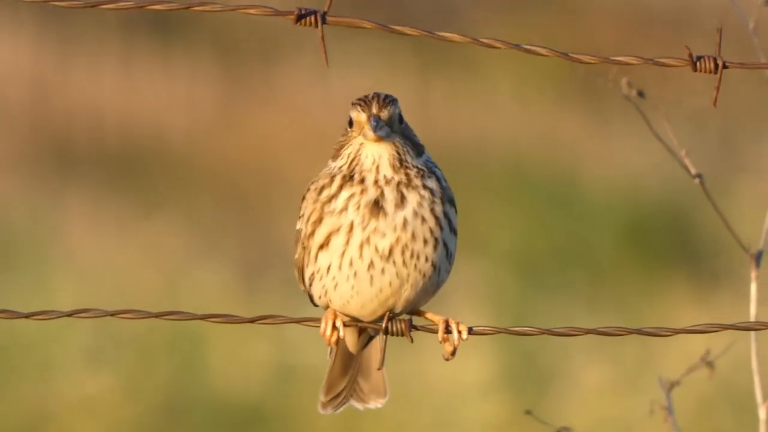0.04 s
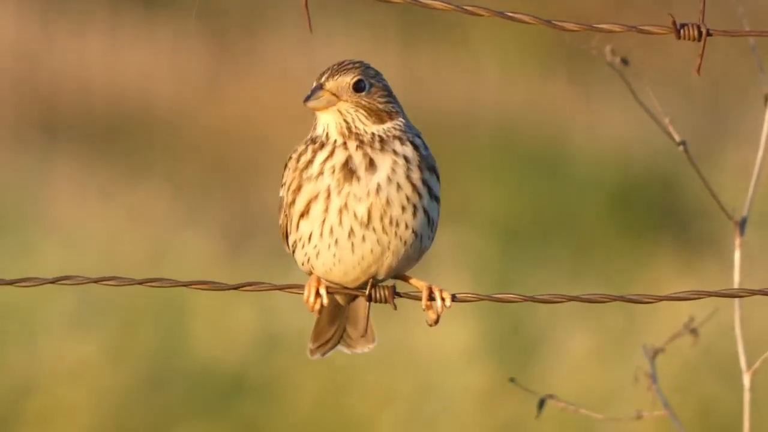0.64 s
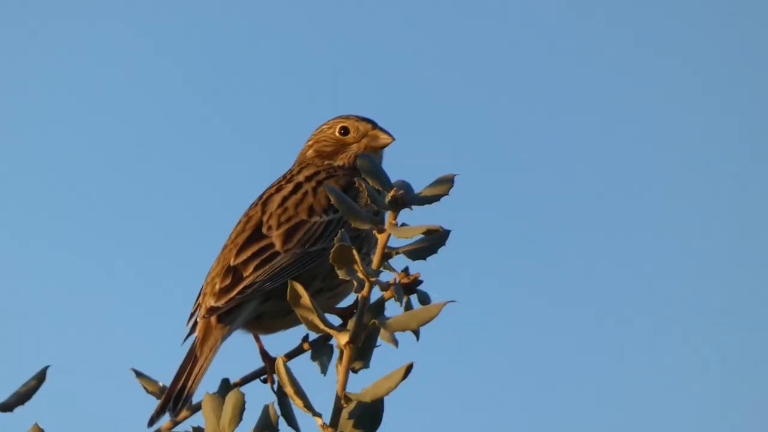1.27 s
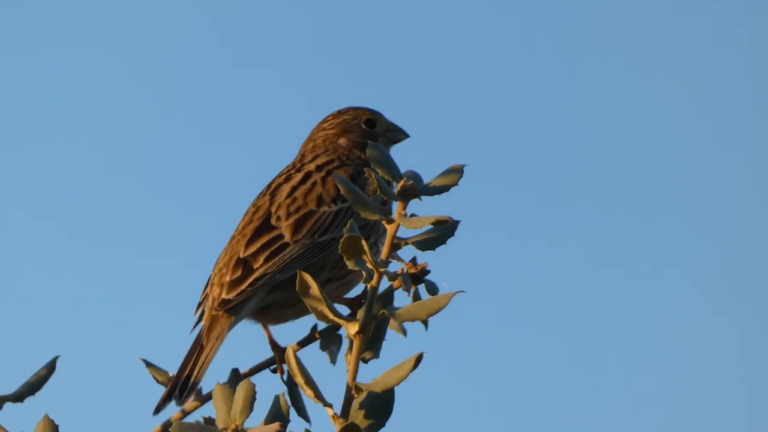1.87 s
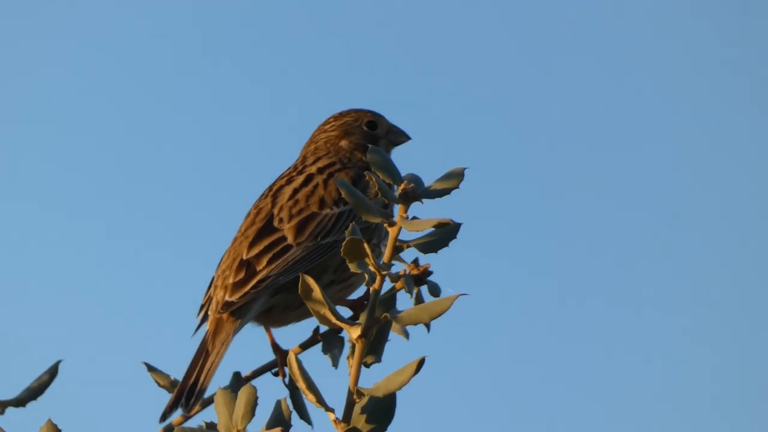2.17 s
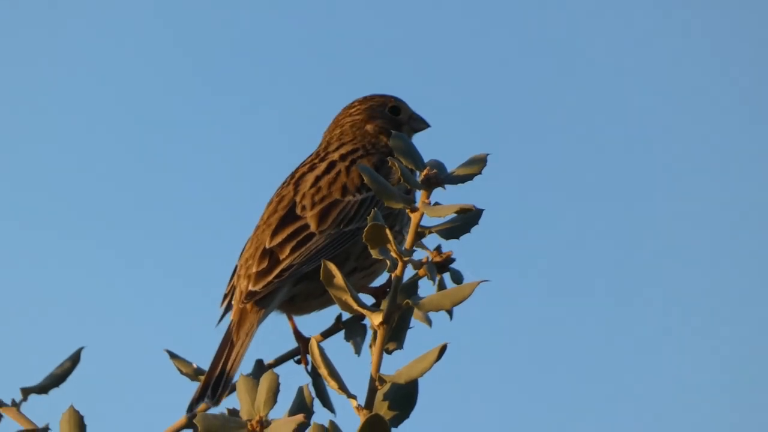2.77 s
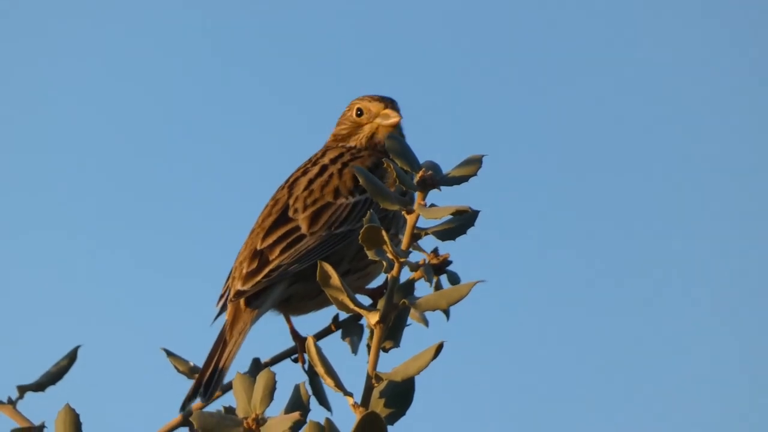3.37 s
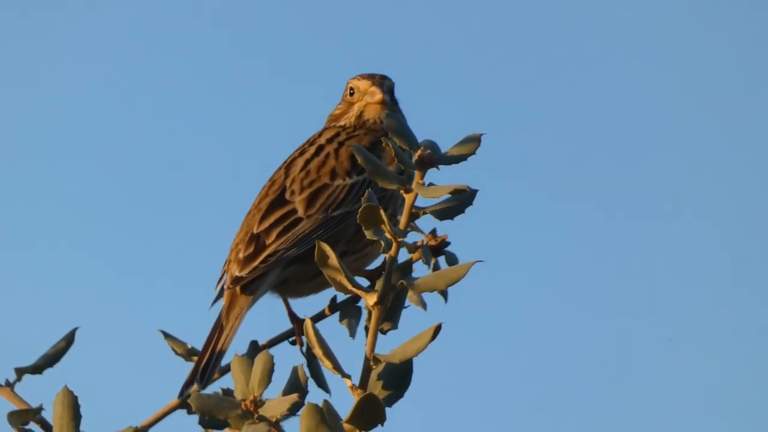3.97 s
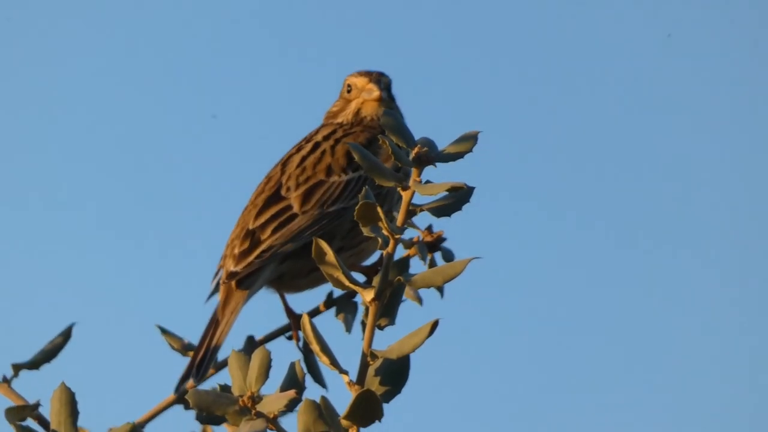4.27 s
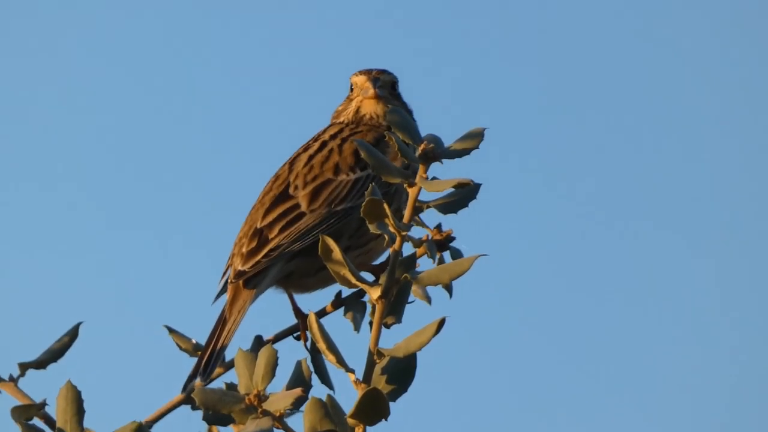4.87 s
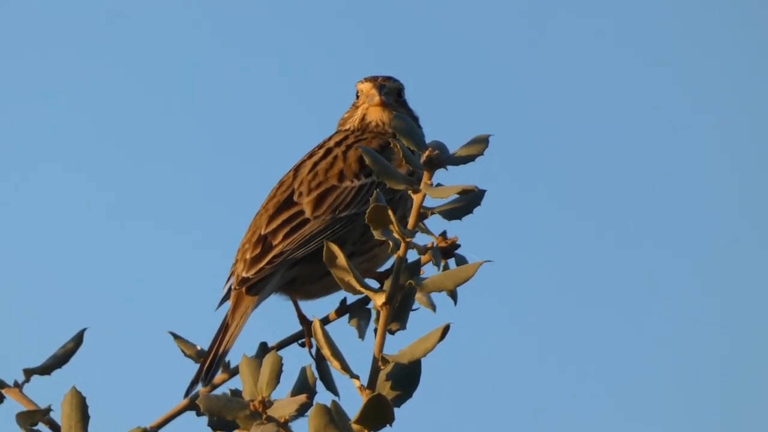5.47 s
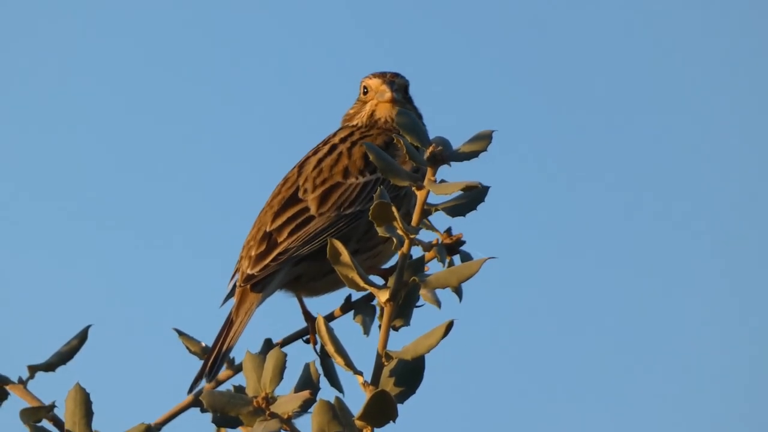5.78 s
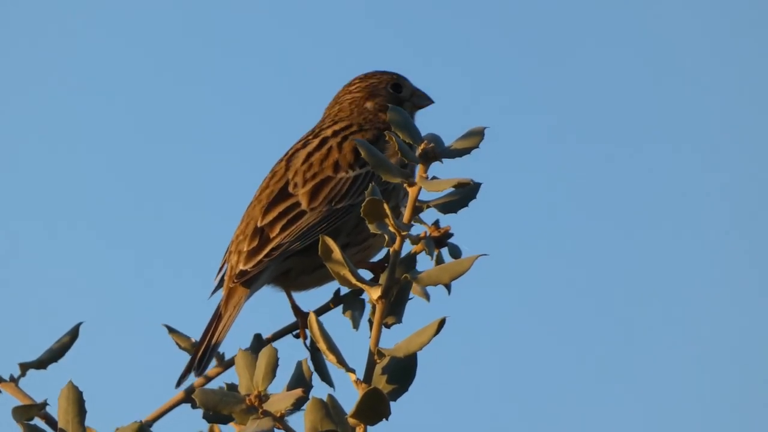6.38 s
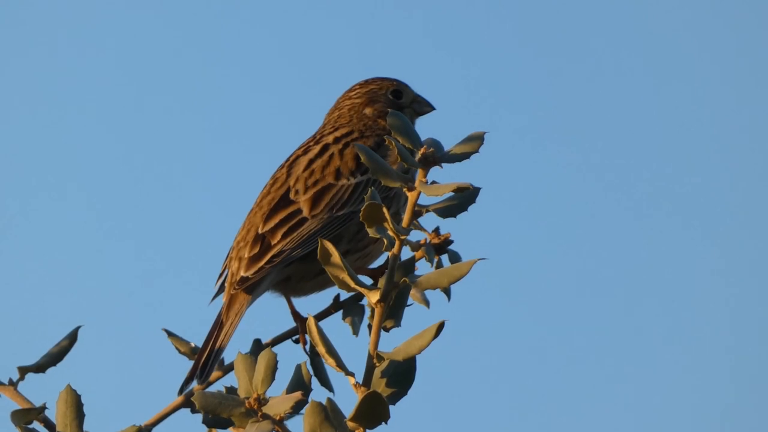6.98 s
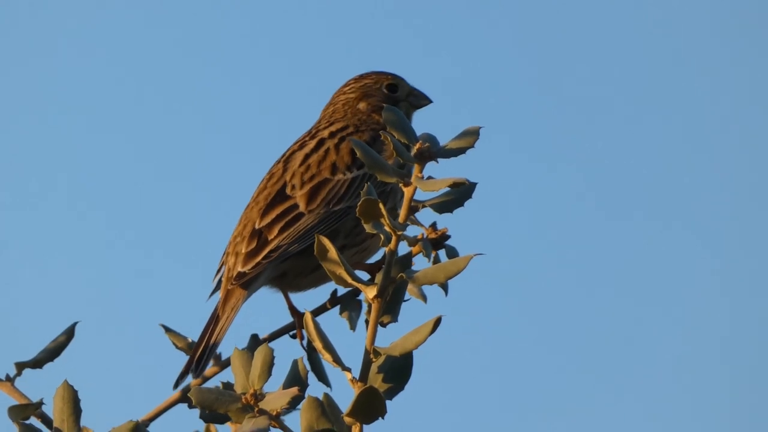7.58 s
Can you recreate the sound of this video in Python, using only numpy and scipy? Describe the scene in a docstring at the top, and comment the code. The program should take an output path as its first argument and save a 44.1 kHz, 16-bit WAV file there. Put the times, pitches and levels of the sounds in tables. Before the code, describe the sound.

A close lens motor hums and ticks quietly outdoors while one songbird calls once, brief and piercing, and other birds chirp far off.

```python
"""Open country: a perched corn bunting gives one sharp, warbled 'tsip', a burst of fused whistled pulses.
Other birds chirp far off, over a faint wavering tone and a soft hiss of air that lifts in one gust.
Close by, a camera's lens drive hums and whirrs through the resonances of its body; the lens knocks,
the housing ticks and clacks. All sound cuts out briefly before the call."""
import sys
import numpy as np
from scipy import signal
from scipy.fft import rfft, irfft, next_fast_len
from scipy.io import wavfile
from scipy.ndimage import uniform_filter1d

SR = 44100
rng = np.random.default_rng(int(sys.argv[2]) if len(sys.argv) > 2 else 0)


def generate_wav(signal):
    """Clip the signal to [-1, 1] and save it as 16-bit WAV at the path in sys.argv[1]."""
    frames = np.transpose(np.atleast_2d(signal))
    scaled = np.clip(frames, -1, 1) * 32767
    pcm = np.round(scaled).astype(np.int16)
    wavfile.write(sys.argv[1], SR, pcm)


N = 336483
TIME = np.arange(N) / SR

# hiss, in phase (mid) and in antiphase (side): (frequency [Hz], relative density [dB/Hz])
AIR_MID_SPECTRUM = [(25, -111), (80, -94.5), (250, -95), (500, -91.5), (1000, -102.5), (1600, -102),
                    (3000, -105), (5000, -112), (7200, -117), (8300, -124), (9000, -118), (10200, -115.7),
                    (13000, -122.7), (15000, -132)]
AIR_SIDE_SPECTRUM = [(25, -112), (80, -95.5), (200, -84.5), (500, -96), (1100, -89.5), (1600, -104),
                     (3000, -109), (5000, -116), (8300, -126), (10000, -120), (14000, -131)]
# far tone: (start [s], end [s], level [dB])
TONE_SPANS = [(1.3, 2.25, -74), (4.15, 5.347, -74)]
# far chirps: (time [s], length [s], start [Hz], middle [Hz], end [Hz], relative level [dB], rasp [Hz])
FAR_CHIRPS = [(.08, .19, 4520, 4400, 4470, -70, 44), (.11, .056, 2830, 2730, 2700, -64, 33),
              (.668, .022, 4650, 4150, 3750, -64, 60), (.786, .018, 5350, 4780, 4400, -63, 60),
              (.864, .022, 4700, 4250, 3950, -64, 60), (.83, .16, 3530, 3920, 4390, -60, 30),
              (.975, .14, 4380, 4620, 4600, -66, 35), (1.40, .16, 3990, 3780, 3740, -61.5, 50),
              (1.84, .038, 3790, 5140, 4820, -62, 120), (2.57, .034, 4900, 5150, 5750, -58.5, 100),
              (2.593, .012, 5700, 6150, 5950, -59, 100), (2.92, .04, 4100, 4850, 5150, -62, 200),
              (3.474, .017, 4600, 5450, 4800, -58, 200), (3.745, .085, 4400, 3500, 2950, -62, 90),
              (4.16, .06, 5080, 4650, 4300, -69, 100), (4.23, .08, 4000, 3980, 3990, -64, 35),
              (4.361, .06, 2850, 2550, 2380, -59, 69), (4.95, .14, 3410, 3370, 3300, -67, 80),
              (5.063, .04, 5100, 4550, 4200, -66, 100), (5.105, .065, 4000, 3950, 3600, -64, 100),
              (5.74, .03, 2400, 2550, 2620, -64, 60), (5.925, .16, 4880, 4600, 4790, -65, 15),
              (6.03, .018, 4000, 3850, 3650, -65, 60), (6.058, .013, 3600, 3850, 3900, -65, 60),
              (6.11, .028, 4650, 4350, 4000, -67.5, 60), (6.185, .045, 4050, 3200, 3000, -65, 60),
              (6.355, .05, 3050, 2800, 2720, -64, 130), (6.645, .05, 2550, 2780, 2850, -63.5, 50),
              (6.698, .031, 6400, 6680, 6950, -60.5, 60), (6.732, .032, 6650, 7000, 5900, -64.5, 70),
              (6.937, .07, 5980, 6270, 6750, -62, 45), (6.996, .026, 6740, 6900, 5300, -62.5, 60),
              (7.085, .075, 5500, 5150, 4700, -67.5, 170), (7.164, .061, 5800, 6000, 6540, -59.5, 40),
              (7.218, .031, 6700, 7080, 5370, -62, 60), (7.17, .11, 4100, 3870, 3880, -58.5, 150)]
# far trill: (time [s], length [s], relative level [dB])
TRILL_BURSTS = [(3.125, .115, -62.5), (3.26, .05, -65)]
# harsh far calls: (middle [s], length [s], centre [Hz], width [Hz], level [dB])
FAR_RASPS = [(3.2, 0.21, 5600, 1900, -76), (3.17, .15, 2800, 1000, -73), (4.444, 0.079, 5800, 1500, -69.3),
             (4.515, .075, 4900, 1400, -68.8), (4.679, 0.071, 5700, 1250, -68)]
# handling ticks and dull bumps: (time [s], level [dB], centre [Hz], decay [s])
HOUSING_TICKS = [(.5385, -42, 2400, 0.003), (.7537, -53, 2000, 0.003), (.754, -55.5, 5950, 0.0037),
                 (2.0956, -64.5, 6460, 0.0035), (3.3323, -63.5, 6950, .003), (3.492, -64, 6700, .004),
                 (4.099, -59, 2600, .006), (4.541, -66, 6400, .003), (5.4, -53, 2570, 0.0086),
                 (5.414, -60.5, 6020, .003), (6.768, -61, 4950, 0.0041), (7.2903, -62, 5400, 0.0032)]
HOUSING_BUMPS = [(.538, -60, 179, 0.013), (.754, -57.5, 169, 0.011), (7.05, -56, 280, 0.059),
                 (7.2, -69, 251, 0.49)]
# lens knocks; a plastic part's clack and bounce: (time [s], relative level [dB], hardness [dB/octave])
LENS_CONTACTS = [(1.419, -57, 2), (1.753, -55, 4), (2.102, -53.5, 0), (4.099, -56.5, -5),
                 (4.2205, -53.5, 0), (4.756, -56, 3), (4.955, -56, 2), (5.1575, -55.5, 0),
                 (5.4005, -56, -6)]
PLASTIC_CONTACTS = [(0.5393, -43, 1), (0.5416, -41.5, -1)]
# their modes: (frequency [Hz], gain [dB], t60 [s])
LENS_MODES = [(802, -6.5, .06), (1003, 1.5, 0.07), (1367, 2, 0.044), (1602, 1, 0.039), (1820, -4, .05),
              (2620, -11, 0.099)]
PLASTIC_MODES = [(1350, 1, 0.026), (1800, -2.5, 0.034), (2560, -1.5, 0.0154), (4080, -10, 0.021),
                 (4470, 3, 0.0046)]
# camera body: (frequency [Hz], width [Hz], left gain [dB], right gain [dB], left phase lead [rad])
BODY_MODES = [(441.7, 42.8, 1, -2.5, -1), (394, 48, -19.5, -19, 0.7), (569, 72, -13, -29, -3),
              (633, 70, -14.5, -16.5, 4), (674, 30.2, -23, -28, 3.5), (790, 104, -12.5, -7.5, 3.5),
              (886, 98, -21, -16.5, 3), (961.4, 33, -22.5, -16, -4), (1053, 84, -24.5, -20, -8.5),
              (1187, 100, -20, -35, 1.5), (1368.7, 90, -21.5, -5, 0.43), (1600, 110, -46, -31.5, -0.5),
              (1775, 88, -41.5, -20, 0.6), (1987, 230, -40.5, -30.5, 1), (2128, 96, -26.5, -45, -0.8),
              (2545, 62, -29, -52, 3.5)]
# lens drive runs: (start [s], end [s], hum [dB], whirr [dB])
DRIVE_RUNS = [(0, 0.37, -51, -55), (0.385, 1.11, -52.5, -54.5), (1.293, 5.419, -54.3, -58.5),
              (5.483, 7.448, -54.3, -58.5), (7.502, 8.24, -52, -58)]
# brief swells in the hum's loudness: (time [s], boost [dB], half length [s])
HUM_SURGES = [(.24, 7, 0.045), (0.324, 6, .018), (0.573, 8, 0.012), (0.687, 7.5, 0.021),
              (0.788, 5.5, 0.061), (1.327, 4.5, 0.018), (1.47, 11, 0.032), (1.557, 7.5, 0.033),
              (1.719, 7.5, 0.033), (1.984, 8, 0.019), (2.114, 10, 0.015), (2.277, 10.5, 0.018),
              (2.655, 8, 0.041), (2.865, 6.5, 0.016), (3.005, 9, 0.018), (3.11, 9, .022), (3.22, 8, 0.015),
              (3.356, 7, 0.015), (3.673, 9.5, 0.026), (3.761, 8, 0.027), (3.837, 8, 0.016),
              (4.059, 10.5, 0.026), (4.563, 9, 0.021), (4.769, 5.5, .025), (4.856, 6, 0.017),
              (4.972, 6.5, 0.019), (5.057, 9.5, 0.017), (5.19, 6, 0.05), (5.744, 11, 0.01)]
# brief flares of the whirr near 1370 Hz: (time [s], boost [dB])
WHIRR_FLARES = [(.145, 6), (.387, 6), (.452, 5.5), (.553, 4), (.678, 6.5), (2.344, 11), (2.497, 4),
                (2.841, 5), (3.243, 5.5), (3.376, 6.5), (3.487, 7), (3.783, 5.5), (4.544, 5), (4.562, 7),
                (4.832, 4.5), (5.04, 6), (5.285, 7.5), (5.505, 6.5), (5.647, 7.5), (5.709, 4), (5.783, 8.5),
                (6.03, 5), (6.306, 8), (6.524, 7.5), (6.599, 6), (6.888, 6.5), (7.32, 6)]
# the 'tsip': (time [s], length [s], start [Hz], middle [Hz], end [Hz], relative level [dB], rasp [Hz])
CALL_PULSES = [(1.7755, .0052, 5650, 5550, 5500, -36, 150), (1.7806, .006, 5850, 5950, 5600, -25.3, 170),
               (1.7868, .0065, 5650, 6100, 6400, -23.8, 170), (1.7943, .0078, 6400, 5950, 6050, -22.3, 150),
               (1.8, .008, 6300, 6450, 6250, -24, 170), (1.8015, .008, 7050, 7400, 7000, -36.5, 200),
               (1.8062, .006, 5950, 5900, 6150, -24.5, 170), (1.811, .0085, 6550, 6900, 6650, -34.5, 170)]
# sizzle above it: (middle [s], length [s], centre [Hz], width [Hz], level [dB])
CALL_SIZZLE = [(1.786, .006, 10000, 900, -60), (1.803, .024, 12900, 2900, -55.5)]
# reflections from twigs and ground: (delay [s], gain [dB])
CALL_ECHOES = [(.0052, -16), (0.013, -22.5), (0.093, -38)]


def from_db(db):
    """Decibels to gain."""
    return 10 ** (np.asarray(db) / 20)


def band(x, low_hz, high_hz, order=2):
    """Butterworth band-pass."""
    sos = signal.butter(order, [low_hz, min(high_hz, .45 * SR)], "band", fs=SR, output="sos")
    return signal.sosfilt(sos, x + 1e-18)


def wander(rate_hz, size=N):
    """Random drift, standard deviation 1."""
    steps = np.arange(size) * rate_hz / SR
    knots = rng.standard_normal(int(steps[-1]) + 2)
    return np.interp(steps, np.arange(len(knots)), knots) * np.sqrt(3 / 2)


def swell(peak_s, rise_s, fall_s):
    """Smooth hump, height 1."""
    return np.exp(-((TIME - peak_s) / np.where(TIME < peak_s, rise_s, fall_s)) ** 2)


def shaped_noise(spectrum):
    """Noise of the given spectral density."""
    hz, db = np.transpose(spectrum)
    size = next_fast_len(N)
    bins_hz = np.maximum(np.arange(size // 2 + 1) * SR / size, 1)
    gain = from_db(np.interp(np.log(bins_hz), np.log(hz), db)) * np.sqrt(SR / 2)
    return irfft(rfft(rng.standard_normal(size)) * gain, size)[:N]


def noise_humps(rows, order=2):
    """Soft swells of band noise."""
    out = np.zeros(N)
    for middle_s, length_s, hz, width_hz, db in rows:
        noise = band(rng.standard_normal(N), hz - width_hz / 2, hz + width_hz / 2, order)
        noise /= np.sqrt(np.mean(noise ** 2))
        out += from_db(db) * noise * swell(middle_s, length_s / 2, length_s / 2)
    return out


def whistles(rows, quaver_hz=48):
    """Arched glides with quaver and rasp in the pitch."""
    out = np.zeros(N + SR)
    for time_s, length_s, start_hz, middle_hz, end_hz, db, rasp_hz in rows:
        size = int(length_s * SR)
        progress = np.linspace(0, 1, size)
        glide_hz = np.polyval(np.polyfit([0, .5, 1], [start_hz, middle_hz, end_hz], 2), progress)
        pitch_hz = glide_hz + quaver_hz * wander(90, size) + rasp_hz * wander(900, size)
        envelope = from_db(db) * np.sqrt(np.abs(np.sin(np.pi * progress)))
        first = int(time_s * SR)
        out[first:first + size] += envelope * np.sin(2 * np.pi * np.cumsum(pitch_hz) / SR)
    return out[:N]


def scatter(x, t60_s):
    """Diffuse stereo echo from foliage and ground, unit energy."""
    age_s = TIME[:SR // 2]
    tails = rng.standard_normal((2, len(age_s))) * from_db(-60 * age_s / t60_s)
    tails /= np.sqrt(np.sum(tails ** 2, axis=1, keepdims=True))
    return signal.fftconvolve(x[None], tails, axes=1)[:, :N]


def air(treble_db=-.56, treble_gust_db=6, low_db=-5, low_gust_db=3):
    """Wide hiss; one gust lifts its low and treble bands."""
    gust = swell(peak_s=1.39, rise_s=.18, fall_s=.86)
    hiss = shaped_noise(AIR_MID_SPECTRUM) + shaped_noise(AIR_SIDE_SPECTRUM) * [[1], [-1]]
    treble = band(hiss, 1900, 5200, order=1) * (from_db(treble_db + treble_gust_db * gust) - 1)
    low = band(hiss, 40, 1450, order=1) * (from_db(low_db + low_gust_db * gust) - 1)
    return hiss + treble + low


def far_tone(pitch_hz=990, waver_hz=28, flutter_db=5.5):
    """Thin intermittent tone, unsteady in pitch and level."""
    level = sum(from_db(db) * ((TIME > start_s) & (TIME < end_s)) for start_s, end_s, db in TONE_SPANS)
    phase = 2 * np.pi * np.cumsum(pitch_hz + waver_hz * wander(60)) / SR
    return uniform_filter1d(level, SR // 8) * from_db(flutter_db * wander(13)) * np.sin(phase)


def far_chorus(count=420, low_hz=2400, high_hz=5100, note_s=.05, glide=.1, max_db=-71, rasp_hz=70):
    """Random notes of many faint birds; air dulls the higher ones."""
    when, height, length, bend, slope, distance = rng.random((count, 6)).T
    hz = low_hz * (high_hz / low_hz) ** height
    rise = np.exp(glide * (2 * slope - 1))
    middle_hz = hz * (1 + glide * (bend - .5))
    db = max_db - 6 * distance - 20 * np.log10(hz / low_hz)
    time_s, length_s = when * TIME[-1], note_s * (.3 + length)
    return whistles(zip(time_s, length_s, hz / rise, middle_hz, hz * rise, db, np.full(count, rasp_hz)))


def far_trill(pitch_hz=5080, pulse_hz=98, arch_hz=140, rasp_hz=140, depth=.6):
    """A bird's buzz: quick even pulses, each arching in pitch."""
    pulse = np.cos(2 * np.pi * pulse_hz * TIME)
    phase = 2 * np.pi * np.cumsum(pitch_hz + arch_hz * pulse + rasp_hz * wander(900)) / SR
    level = np.zeros(N)
    for time_s, length_s, db in TRILL_BURSTS:
        progress = np.clip((TIME - time_s) / length_s, 0, 1)
        level += from_db(db) * np.sqrt(np.sin(np.pi * progress).clip(0))
    return level * (1 + depth * pulse) * np.sin(phase)


def far_birds(chirp_gain_db=-4.6, wet_db=-6, waver_db=2.6):
    """Chirps, twitter and harsh calls; distance adds waver and blur."""
    twitter = far_chorus()
    chirps = from_db(chirp_gain_db) * (whistles(FAR_CHIRPS) + far_trill())
    chirps *= from_db(waver_db * wander(70))
    rasps = noise_humps(FAR_RASPS)
    blur = scatter(from_db(wet_db) * chirps + twitter, t60_s=.19)
    return chirps + twitter + rasps + (blur + blur.mean(axis=0)) / 2


def noise_taps(rows, band_ratio, side_db):
    """Each contact is a decaying burst of band noise."""
    out = np.zeros((2, N))
    for time_s, db, hz, decay_s in rows:
        mid, side = rng.standard_normal((2, N))
        noise = mid + from_db(side_db) * side * [[1], [-1]]
        first = int(time_s * SR)
        age_s = TIME[:min(SR // 2, N - first)]
        envelope = np.zeros(N)
        envelope[first:first + len(age_s)] = np.exp(-age_s / decay_s)
        low_hz, high_hz = hz / band_ratio, hz * band_ratio
        power_share = (high_hz - low_hz) / (SR / 2)
        out += band(noise * envelope, low_hz, high_hz) * from_db(db) / np.sqrt(power_share)
    return out


def struck(contacts, modes, vary_db):
    """Each contact rings all modes; harder ones favour the higher modes."""
    out, age_s = np.zeros(N), TIME[:SR // 5]
    centre_hz = np.mean([mode[0] for mode in modes])
    for time_s, contact_db, db_per_octave in contacts:
        first = int(time_s * SR)
        for hz, mode_db, t60_s in modes:
            tilt_db = db_per_octave * np.log2(hz / centre_hz)
            onset_db = contact_db + mode_db + tilt_db + vary_db * rng.standard_normal()
            ring = from_db(onset_db - 60 * age_s / t60_s) * np.sin(2 * np.pi * hz * age_s)
            out[first:first + len(age_s)] += rng.choice([-1, 1]) * ring
    return out


def handling(lens_left_db=-5.5, lens_right_db=4):
    """Ticks, bumps and a plastic clack on the housing; lens knocks to the right."""
    ticks = noise_taps(HOUSING_TICKS, band_ratio=1.32, side_db=-5.5)
    bumps = noise_taps(HOUSING_BUMPS, band_ratio=1.35, side_db=-3)
    knocks = struck(LENS_CONTACTS, LENS_MODES, vary_db=2.5) * from_db([[lens_left_db], [lens_right_db]])
    return ticks + bumps + knocks + struck(PLASTIC_CONTACTS, PLASTIC_MODES, vary_db=2)


def camera_body(force, modes, window_s):
    """Noise-driven two-stage resonances, levelled to a running mid rms of 1."""
    out = np.zeros((2, N))
    for hz, width_hz, left_db, right_db, lead_rad in modes:
        radius = np.exp(-np.pi * width_hz / SR)
        pole = radius * np.exp(2j * np.pi * hz / SR)
        shaking = force * rng.standard_normal(N)
        motion = signal.lfilter([(1 - radius) ** 2], [1, -2 * pole, pole ** 2], shaking)
        out[0] += from_db(left_db) * (motion * np.exp(1j * lead_rad)).real
        out[1] += from_db(right_db) * motion.real
    return out / np.sqrt(uniform_filter1d(out.mean(axis=0) ** 2, int(window_s * SR)) + 1e-20)


def drive_force(jerks_per_s=76, depth_db=4.5):
    """The drive moves in jerks, each of random strength and length."""
    jerk_index = np.cumsum(rng.random(N) < jerks_per_s / SR)
    return from_db(depth_db * np.minimum(rng.standard_normal(N), 1))[jerk_index]


def whirr_flares(whirr, dip_db=3, dip_s=.009, rise_s=.004, fall_s=.023):
    """Brief flares of the whirr near 1370 Hz, each after a slight dip."""
    dips = sum(swell(time_s - dip_s, dip_s, dip_s / 2) for time_s, _ in WHIRR_FLARES)
    whirr = whirr * from_db(-dip_db * dips)
    flare_db = sum(db * swell(time_s + rise_s, rise_s, fall_s) for time_s, db in WHIRR_FLARES)
    return whirr + band(whirr, 1280, 1460, order=1) * (from_db(flare_db) - 1)


def lens_drive(rest_db=-15, unsteady_db=1.12, start_boost_db=1.5, settle_s=.22, ramp_s=.011):
    """A fluttering force shakes the camera body: hollow surging hum, whirr above."""
    hum_db, whirr_db = np.zeros((2, N)) + np.mean(DRIVE_RUNS, axis=0)[2:, None] + rest_db
    for start_s, end_s, run_hum_db, run_whirr_db in DRIVE_RUNS:
        running = (TIME >= start_s) & (TIME < end_s)
        hum_db[running] = run_hum_db
        whirr_db[running] = run_whirr_db + start_boost_db * np.exp((start_s - TIME[running]) / settle_s)
    hum_db, whirr_db = uniform_filter1d([hum_db, whirr_db], int(ramp_s * SR))
    hum_db += unsteady_db * wander(22)
    hum_db += sum(db * swell(time_s, half_s, half_s) for time_s, db, half_s in HUM_SURGES)
    force = drive_force()
    # the heavy low modes follow the jerks only in part
    hum = camera_body(np.sqrt(force), BODY_MODES[:2], window_s=.082) * from_db(hum_db)
    whirr = camera_body(force, BODY_MODES[2:], window_s=.14) * from_db(whirr_db)
    return hum + whirr_flares(whirr)


def bunting(roughness=.22, side_db=-17.5, side_delay_s=.001261, wet_db=-28.5, sizzle_wet_db=-11):
    """Rough fused pulses under a sizzle; then a near side reflection, echoes and a thin tail."""
    pulses = whistles(CALL_PULSES) * (1 + roughness * wander(1400))
    sizzle = noise_humps(CALL_SIZZLE, order=4)
    call = band(pulses, 5250, 7750, order=5) + sizzle  # passband of throat and beak
    echoes = sum(from_db(db) * np.interp(TIME - delay_s, TIME, call) for delay_s, db in CALL_ECHOES)
    side_echo = from_db(side_db) * np.interp(TIME - side_delay_s, TIME, call) * [[1], [-1]]
    tail = from_db(wet_db) * scatter(band(call, 5900, 7500), t60_s=.57).mean(axis=0)
    sizzle_tail = from_db(sizzle_wet_db) * scatter(sizzle, t60_s=.14)
    return call + echoes + side_echo + tail + sizzle_tail


def scene():
    """Birds, far tone and air, with the camera close by."""
    return bunting() + far_birds() + far_tone() + air() + lens_drive() + handling()


def record(dry):
    """One short silence and a steep low-pass."""
    mute_start_s, mute_end_s, cutoff_hz = 1.113, 1.293, 15300
    audible = (TIME < mute_start_s) | (TIME > mute_end_s)
    return signal.sosfilt(signal.ellip(10, .1, 80, cutoff_hz, fs=SR, output="sos"), dry * audible)


dry = scene()
out = record(dry)
generate_wav(out)
```